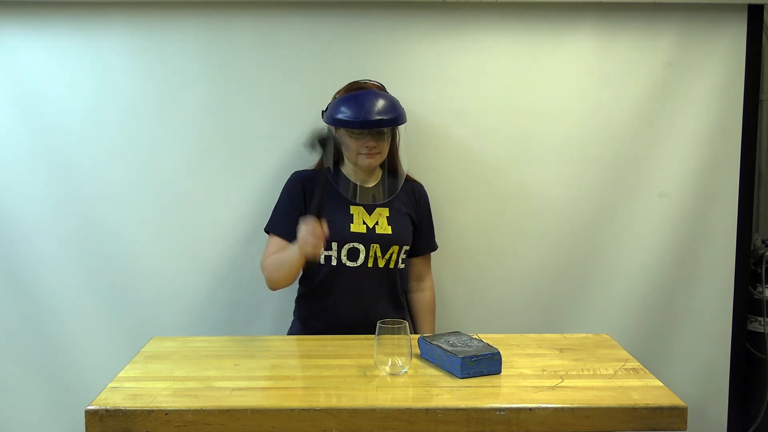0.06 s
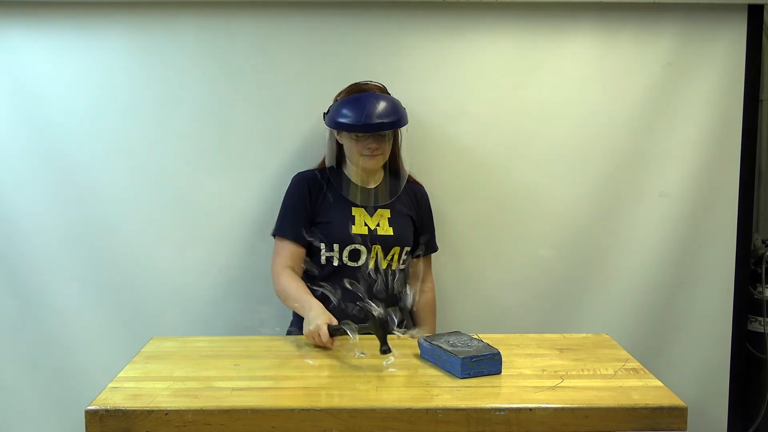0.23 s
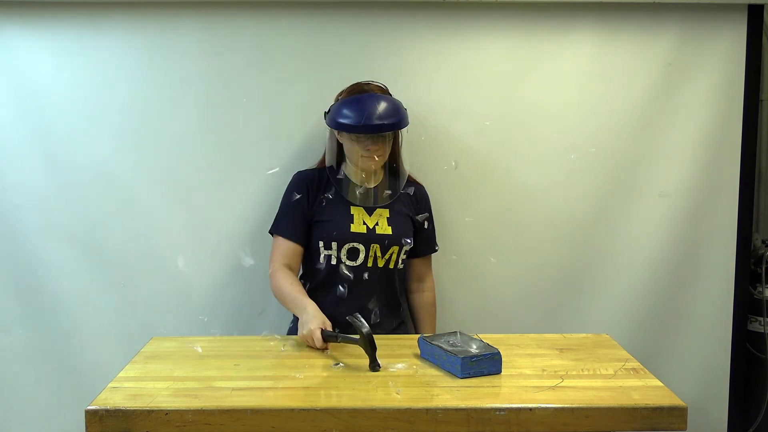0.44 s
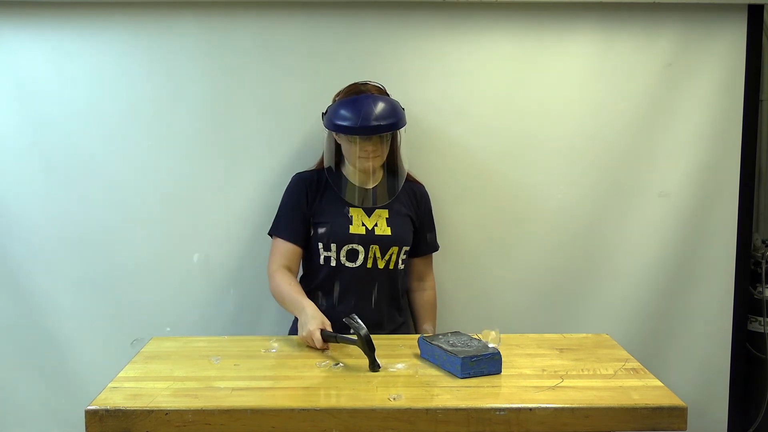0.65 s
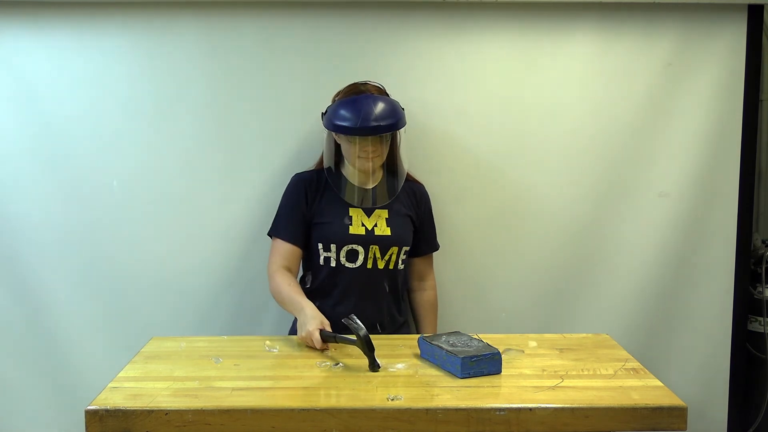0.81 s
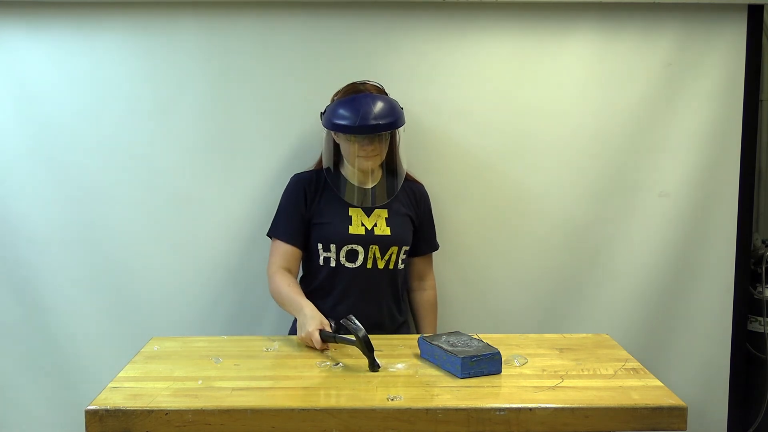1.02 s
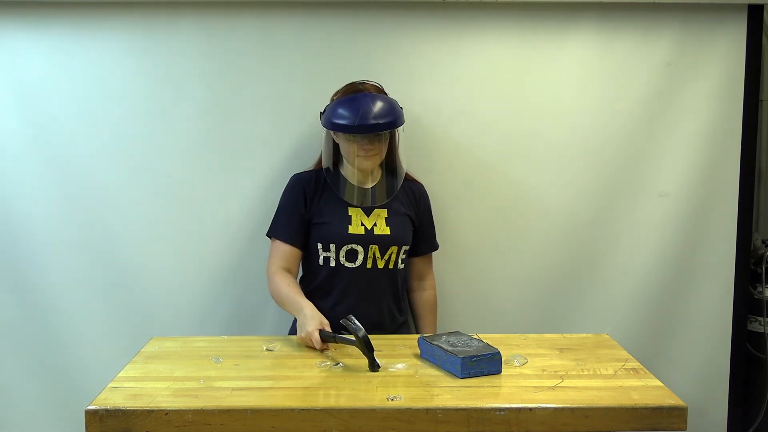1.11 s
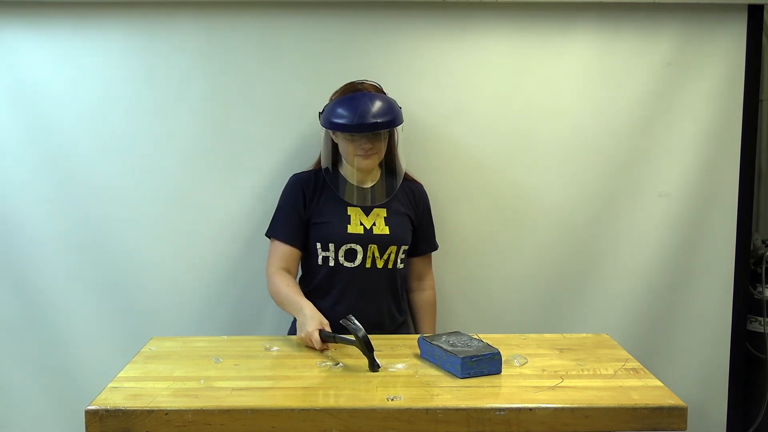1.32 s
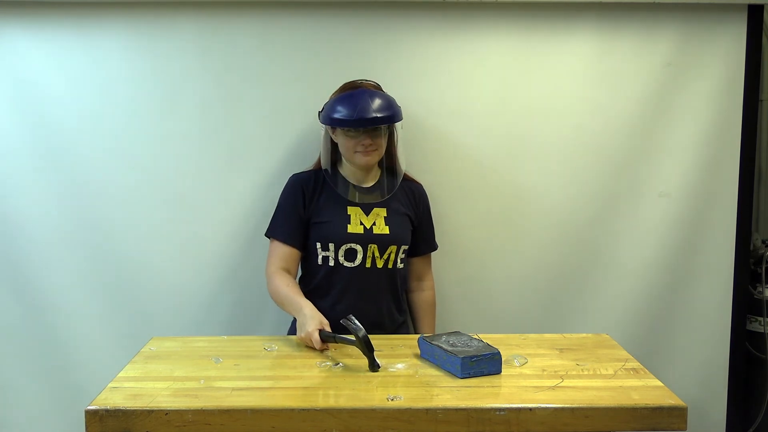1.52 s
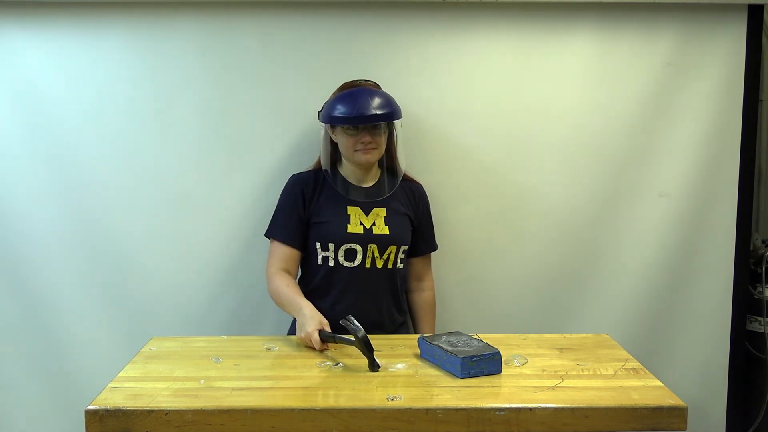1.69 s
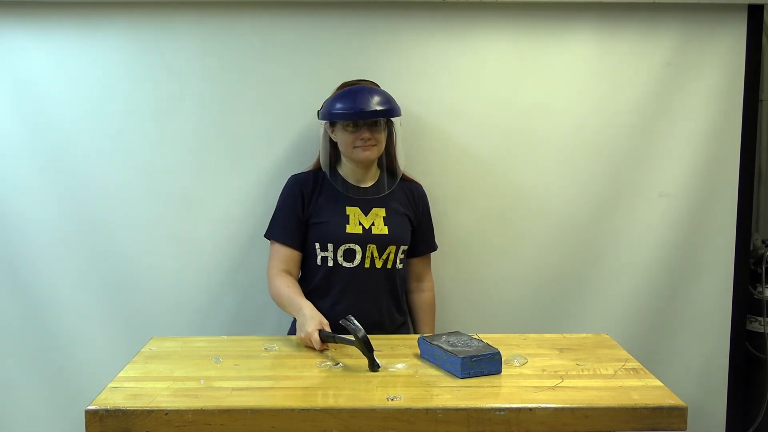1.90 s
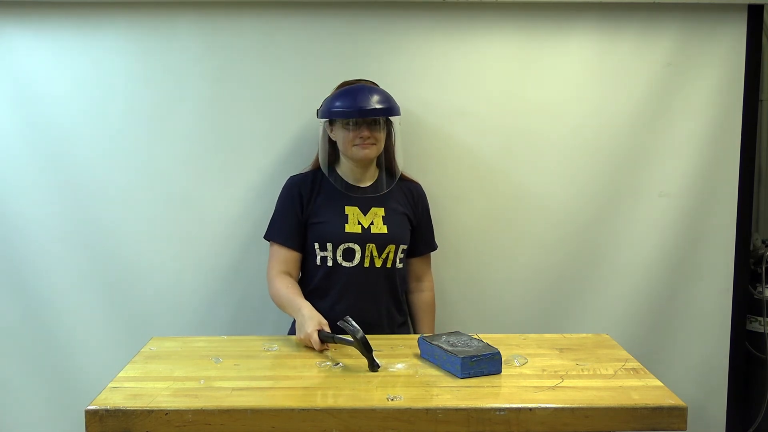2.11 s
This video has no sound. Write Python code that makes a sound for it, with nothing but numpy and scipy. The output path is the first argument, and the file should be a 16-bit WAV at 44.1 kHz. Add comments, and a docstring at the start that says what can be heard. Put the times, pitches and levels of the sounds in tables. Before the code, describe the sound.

A drinking glass shatters with a sharp crack at about 0.25 seconds, and the hammer thumps and bounces on a wooden table until 0.5. Shards clatter and ring loudly, with a few pieces thudding on the floor around 0.75. From 1.4 seconds the debris thins to light, high tinkles, settling by about 2.1. Faint ventilation hums throughout in the hard-walled room.

```python
"""A hammer smashes a drinking glass

Ventilation hums in a quiet, hard-walled room. The glass cracks, and the hammer head thumps and
bounces on the wooden table, making its top ring. Shards rain on table and floor, clattering and
ringing until the last splinter settles. A limiter (an automatic volume control) holds the loud
part level."""
import sys
import numpy as np
from scipy import signal
from scipy.fft import rfft, irfft
from scipy.io import wavfile

SR = 44100
rng = np.random.default_rng(int(sys.argv[2]) if len(sys.argv) > 2 else 0)


def transcribe(signal):
    """Save signal, clipped to [-1, 1], as a 16-bit WAV file at the path in sys.argv[1]."""
    frames = np.atleast_2d(signal).T
    limited = np.clip(frames, -1, 1)
    pcm = np.round(limited * 32767).astype(np.int16)
    wavfile.write(sys.argv[1], SR, pcm)


N = 94815
TIME = np.arange(N) / SR

# How loud the falling splinters are. Each row: time in seconds, level in dB.
SPLINTER_LEVELS = [(.243, -69), (.25, -32.5), (.37, -41), (.42, -43.5), (.63, -38), (.655, -24.5),
                   (.76, -34), (.82, -28), (1.12, -27), (1.25, -34.5), (1.36, -41.5), (1.52, -42),
                   (1.66, -40.5), (1.71, -38), (1.87, -48.5), (1.95, -94)]
# The tone colour of the splinters. Each row: frequency in Hz, level in dB.
SPLINTER_COLOUR = [(7000, 3.5), (8500, 1), (10000, 11), (12500, -5.5), (14900, -6)]


def from_db(db):
    """Turn decibels into a number to multiply by."""
    return 10 ** (np.asarray(db) / 20)


def unit_power(x):
    """Scale a sound to an average power of 1."""
    return x / np.sqrt(np.mean(x ** 2) + 1e-20)


def at_hz(points, hz):
    """Read between the rows of a table, spacing frequencies by octaves."""
    row_hz, values = np.transpose(points)
    return np.interp(np.log(hz + 1e-9), np.log(row_hz), values)


def coloured(x, colour):
    """Turn each frequency up or down by a table of Hz and dB."""
    hz = np.fft.rfftfreq(x.shape[-1], 1 / SR)
    return irfft(rfft(x) * from_db(at_hz(colour, hz)), x.shape[-1])


def stereo_noise(size=N):
    """Noise from all around: alike in both ears in the bass, wide in the treble."""
    # Each row: frequency in Hz, level in dB of the left-right difference against the shared part.
    width = [(150, -21), (350, -15), (700, -9), (1500, -5), (4000, -2.5), (12000, -5)]
    return rng.standard_normal(size) + coloured(rng.standard_normal(size), width) * np.array([[1], [-1]])


def fade(t60):
    """Die away from 1, dropping 60 dB in t60 seconds."""
    return np.exp(-np.minimum(np.log(1000) * TIME / t60, 40))


def add(out, start_s, x):
    """Mix x into out at the given time."""
    start = int(np.clip(start_s * SR, 0, N - 1))
    out[start:start + len(x)] += x[:N - start]


def ring(clicks, hz, t60):
    """Each click starts a fading tone as strong as the click."""
    decay = np.exp(-np.log(1000) / (t60 * SR))
    angle = 2 * np.pi * hz / SR
    return signal.lfilter([0, np.sin(angle)], [1, -2 * decay * np.cos(angle), decay ** 2], clicks + 1e-18)


def high_pass(x, hz):
    """Steeply cut everything below hz."""
    return signal.sosfilt(signal.butter(8, hz, "high", fs=SR, output="sos"), x)


def ventilation(air_db=-52.5):
    """A soft rush of air with a few steady fan tones."""
    # The rushing air. Each row: frequency in Hz, relative level in dB.
    air_colour = [(30, -36), (100, -6.5), (280, -7.5), (900, -13.5), (1400, -20.5), (5000, -29.5),
                  (12000, -48.5)]
    # The fan tones. Each row: pitch in Hz, level in dB.
    fan_tones = [(281, -67.5), (712, -59), (1001, -64.5)]
    hum = sum(from_db(db) * np.sqrt(2) * np.sin(2 * np.pi * (hz * TIME + rng.random()))
              for hz, db in fan_tones)
    return from_db(air_db) * unit_power(coloured(stereo_noise(), air_colour)) + hum


def shower(levels, colour, hits_per_s, ring_cycles, spread_db=4.5):
    """Pieces of one size land at random; each rings its own mix of 36 short tones."""
    hits = np.flatnonzero(rng.random(N) < hits_per_s / SR)
    strengths = from_db(spread_db * np.minimum(rng.exponential(1, N), 3))[hits]
    lowest_hz, highest_hz = colour[0][0], colour[-1][0]
    out = np.zeros(N)
    for hz in np.geomspace(lowest_hz, highest_hz, 36):
        clicks = np.zeros(N)
        clicks[hits] = strengths * rng.standard_normal(N)[hits]
        ringing = unit_power(ring(clicks, hz, ring_cycles / hz))
        out += from_db(at_hz(colour, hz)) * np.sqrt(hz) * ringing  # higher tones stand for wider bands
    times, db = np.transpose(levels)
    loudness = from_db(np.interp(TIME, times, db)) * (TIME > times[0])
    return unit_power(high_pass(out, lowest_hz * 2 / 3)) * loudness


def falling_glass():
    """The wood rattles under a rain of chunks, shards and splinters; smaller pieces ring higher."""
    # How loud each layer is. Each row: time in seconds, level in dB.
    rattle_levels = [(.245, -36), (.262, -9.5), (.5, -21), (.56, -24), (.7, -21.5), (.83, -29),
                     (1.0, -32.5), (1.09, -35.5), (1.15, -54), (1.21, -33), (1.42, -63), (1.47, -85)]
    chunk_levels = [(.243, -21), (.25, -23), (.5, -23), (.6, -20.5), (.7, -23), (.82, -17.5), (.92, -27.5),
                    (1.0, -20.5), (1.12, -37.5), (1.24, -33), (1.35, -50), (1.41, -59), (1.5, -99)]
    shard_levels = [(.243, -55), (.25, -27), (.37, -24.5), (.42, -30), (.52, -24), (.56, -24.5),
                    (.72, -20.5), (.85, -22), (.97, -18), (1.1, -27), (1.2, -26), (1.35, -38),
                    (1.41, -21.5), (1.5, -52), (1.66, -40.5), (1.73, -40), (1.88, -61), (1.96, -75)]
    # The tone colour of each layer. Each row: frequency in Hz, level in dB.
    rattle_colour = [(240, -25), (350, -3), (560, -1.5), (800, -1.5), (1300, -13)]
    chunk_colour = [(680, -11), (1300, -6.5), (2000, -6.5), (2800, -12.5), (3600, -13.5)]
    shard_colour = [(2100, -4), (3000, 5), (4200, 4), (5800, 3), (7500, -2)]
    return (shower(rattle_levels, rattle_colour, hits_per_s=380, ring_cycles=27)
            + shower(chunk_levels, chunk_colour, hits_per_s=450, ring_cycles=66)
            + shower(shard_levels, shard_colour, hits_per_s=400, ring_cycles=66)
            + shower(SPLINTER_LEVELS, SPLINTER_COLOUR, hits_per_s=220, ring_cycles=130))


def tinkling_chips(chips_per_s=180, boost_db=3, spread_db=2):
    """Small chips land at random, each with its own pitch; their loudness follows the splinters."""
    times, levels = np.transpose(SPLINTER_LEVELS)
    out, decay = np.zeros(N), fade(t60=0.1)[:SR // 2]
    lands = (rng.random(N) < chips_per_s / SR) & (TIME > times[0])
    pitches = rng.uniform(SPLINTER_COLOUR[0][0], SPLINTER_COLOUR[-1][0], N)
    chips = np.column_stack([TIME, pitches, rng.normal(boost_db, spread_db, N)])
    for start, hz, extra_db in chips[lands]:
        db = np.interp(start, times, levels) + at_hz(SPLINTER_COLOUR, hz) / 2 + extra_db
        add(out, start, from_db(db) * decay * np.sin(2 * np.pi * hz * TIME[:len(decay)]))
    return out


def cracks_and_clacks(width_octaves=1.81, grain=1.17):
    """The glass breaks, then pieces land hard: sudden bursts of crackle that die quickly."""
    # The bursts. Each row: start in seconds, level in dB, centre frequency in Hz.
    bursts = [(0.2459, -5, 1200), (0.247, -9.5, 4200), (0.528, -13, 4640), (0.57, -11.5, 1810),
              (0.6434, -12, 8400), (0.73, -22, 2780), (.853, -10.5, 1820), (0.979, -11, 2920),
              (1.149, -11, 4700), (1.196, -9.5, 2090), (1.236, -14.5, 1900), (1.381, -18, 1960),
              (1.41, -20, 3140), (1.52, -22.5, 3340), (1.544, -26.5, 3500), (1.604, -27, 3460),
              (1.857, -32.5, 3360), (1.98, -40.5, 10970), (2.0837, -31.5, 8900)]
    out = np.zeros(N)
    for start, db, hz in bursts:
        edges_hz = np.clip(hz * 2 ** (np.array([-.5, .5]) * width_octaves), 20, SR * .45)
        noise = rng.standard_normal(N)
        crackle = np.sign(noise) * np.abs(noise) ** grain  # grain above 1 makes the noise spiky
        burst = signal.sosfilt(signal.butter(3, edges_hz, "band", fs=SR, output="sos"), crackle)
        add(out, start, from_db(db) * unit_power(burst) * fade(t60=0.059))
    return out


def ringing_shards():
    """Single shards ring briefly; echoes from close by make each tone swell and flutter."""
    # The rings. Each row: start in seconds, level in dB, pitch in Hz.
    pings = [(0.247, -14, 7327), (0.252, -27, 6070), (0.249, -24.5, 11620), (0.384, -17, 7460),
             (0.528, -7, 5852), (0.533, -15.5, 7280), (0.68, -10.5, 9600), (.685, -26, 12527),
             (0.778, -12, 7430), (0.796, -8, 8165), (.838, -12.5, 5090), (0.849, -11, 6220),
             (0.861, -18.5, 11620), (.862, -14, 13760), (.9134, -10.5, 5040), (.968, -20, 15100),
             (0.991, -13, 9850), (1.021, -6.5, 9415), (1.028, -9, 3736), (1.0557, -8, 8050),
             (1.098, -13.5, 8050), (1.099, -19, 14450), (1.115, -14.5, 10180), (1.61, -33.5, 5000),
             (1.236, -9.5, 10240), (1.296, -10, 7478), (1.4, -18, 9750), (1.42, -21, 6423),
             (1.475, -17, 10320), (1.48, -26, 14200), (1.493, -22, 12800), (1.511, -24, 9550),
             (1.54, -21, 5017), (1.565, -29, 6804), (1.586, -27, 6340), (1.696, -25, 6670),
             (1.70, -26, 14580), (1.703, -21, 11560), (1.722, -11, 7490), (1.749, -14, 7425),
             (1.829, -13, 7480), (1.887, -25, 7480), (2.0813, -41, 14500), (2.098, -31, 11300)]
    out, size = np.zeros((2, N)), SR // 2
    ring_fade, echo_fade = fade(t60=0.14)[:size], fade(t60=0.14)[:size]
    for start, db, hz in pings:
        tone = from_db(db) * ring_fade * np.sin(2 * np.pi * hz * TIME[:size])
        echoes = stereo_noise(size) * echo_fade
        heard = signal.fftconvolve(tone[None], echoes, axes=1)[:, :size]
        for channel, x in zip(out, tone.std() * unit_power(heard)):
            add(channel, start, x)
    return out


def hammer(ring_cycles=24.1, spread_db=2.3):
    """The hammer hits the table and bounces, ringing the wood; some blows sound bright, others dull."""
    # The blows. Each row: start in seconds, level in dB, frequency in Hz above which tones weaken.
    blows = [(0.2626, 0.5, 1190), (0.301, -11, 483), (0.344, 0.5, 280), (.394, 0, 1430), (.461, 0, 1280),
             (.493, 1, 527)]
    # The natural tones of the table top. Each row: pitch in Hz, level in dB.
    wood_tones = [(160, -24), (205, -18.5), (255, -12), (304, -10), (356, -4), (478, -0.5), (568, -1.5),
                  (745, -2.5), (804, 0), (888, 1.5), (1010, -6), (1200, 0)]
    starts, blow_db, bright_hz = np.transpose(blows)
    out = np.zeros(N)
    for k, (hz, tone_db) in enumerate(wood_tones):
        strengths = from_db(blow_db + tone_db + rng.normal(0, spread_db, len(starts)))
        clicks = np.zeros(N)
        clicks[(starts * SR).astype(int)] = strengths / np.hypot(1, (hz / bright_hz) ** 2)
        out += (-1) ** k * ring(clicks, hz, ring_cycles / hz)  # every other tone starts downward
    return out


def floor_thuds():
    """Heavy pieces land and make the floor boom briefly."""
    # The landings. Each row: start in seconds, level in dB.
    landings = [(0.727, -12), (.747, -8), (.783, -7)]
    # The tone colour of the floor. Each row: frequency in Hz, level in dB.
    floor_colour = [(100, 8), (160, 4), (230, -5.5), (380, 10), (900, -6), (4000, -24.5)]
    out = np.zeros(N)
    for start, db in landings:
        boom = unit_power(coloured(rng.standard_normal(N), floor_colour))
        add(out, start, from_db(db) * boom * fade(t60=0.11))
    return out


def room(x, echo_db, gap_s=0.0028):
    """Hard walls add a wash of echoes that dies soonest in the high treble."""
    # How long the room rings. Each row: frequency in Hz, seconds to fade by 60 dB.
    fade_times = [(150, 0.35), (2000, 0.47), (7000, 0.38), (14000, 0.22)]
    spectrum, hz = rfft(stereo_noise()), np.fft.rfftfreq(N, 1 / SR)
    tail = np.zeros((2, N))
    for low_hz in 45 * 2. ** np.arange(9):
        t60 = at_hz(fade_times, low_hz * np.sqrt(2))
        octave = irfft(spectrum * ((hz >= low_hz) & (hz < 2 * low_hz)), N)
        tail += octave * fade(t60) * np.sqrt(2 * np.log(1000) / (t60 * SR))  # same energy for any t60
    echoes = signal.fftconvolve(np.atleast_2d(x), tail * (TIME > gap_s), axes=1)[:, :N]
    return (x + from_db(echo_db) * echoes) / np.hypot(1, from_db(echo_db))


def scene():
    """The smash sounds in the room, slightly to the right, over the ventilation."""
    smash = falling_glass() + hammer() + cracks_and_clacks() + floor_thuds() + tinkling_chips()
    smash = high_pass(smash, hz=144)  # table and floor give off no deep bass
    in_room = room(smash, echo_db=3) + room(ringing_shards(), echo_db=-1.5)
    return in_room * from_db([[-0.4], [0.4]]) + ventilation()


def record(dry, limit_db=-10, attack_s=0.007, release_db_per_s=27.5, cutoff_hz=15800):
    """A limiter lets the crack through, then holds the level; peaks are rounded, top treble is cut."""
    smoothing = np.exp(-1 / (attack_s * SR))
    power = signal.lfilter([1 - smoothing], [1, -smoothing], np.mean(dry ** 2, axis=0))
    excess_db = np.maximum(10 * np.log10(power + 1e-12) - limit_db, 0)
    recovery_db = release_db_per_s * TIME
    cut_db = np.maximum.accumulate(excess_db + recovery_db) - recovery_db  # down fast, back up slowly
    rounded = 1.2 * np.tanh(dry * from_db(-cut_db) / 1.2)
    return signal.sosfilt(signal.ellip(10, .2, 80, cutoff_hz, fs=SR, output="sos"), rounded)


dry = scene()
out = record(dry)
transcribe(out)
```